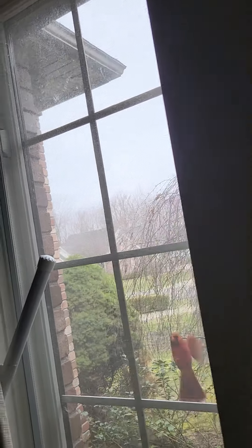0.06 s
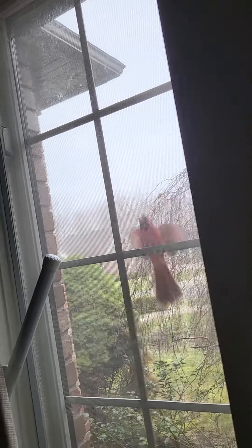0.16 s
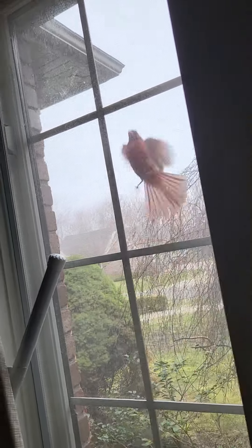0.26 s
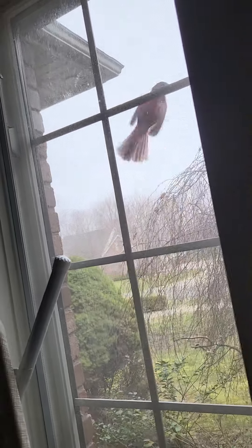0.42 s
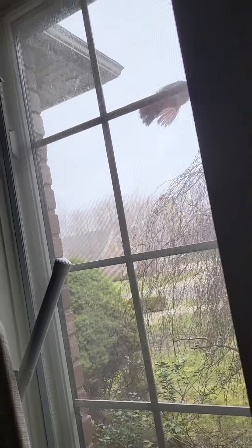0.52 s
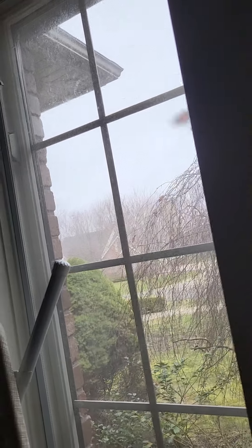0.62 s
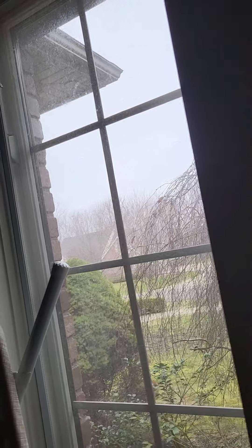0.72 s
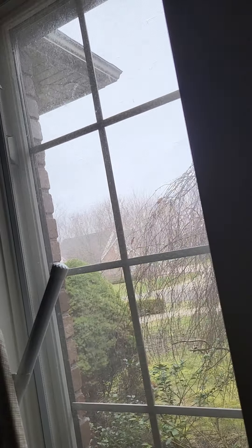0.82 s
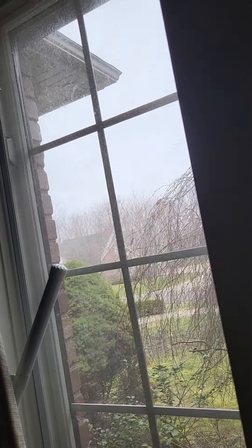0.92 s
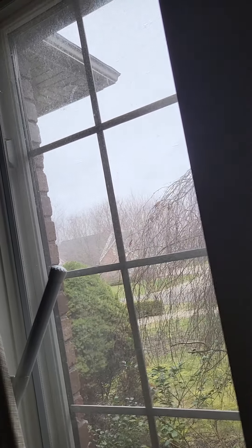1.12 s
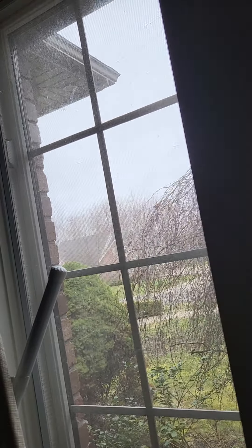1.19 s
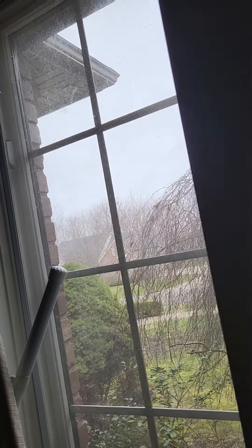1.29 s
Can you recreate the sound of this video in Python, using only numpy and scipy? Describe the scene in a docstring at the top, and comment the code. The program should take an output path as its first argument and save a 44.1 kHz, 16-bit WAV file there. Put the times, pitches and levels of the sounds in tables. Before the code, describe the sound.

One low thud of a bird hitting a window, the pane ringing briefly.

```python
"""A bird flies into a window, heard from inside a small quiet room.
A low ventilation rumble and a faint hiss run from the start.
At 0.2 s beak, head and breast land within 25 ms: the glass clacks and thuds, the sash rattles.
The pane booms on in its low modes, the sash rings thinly and the room answers.
At 1.1 s one tiny tick follows."""
import sys
import numpy as np
from scipy import signal
from scipy.fft import rfft, irfft, next_fast_len
from scipy.io import wavfile
from scipy.ndimage import map_coordinates

SR = 44100
rng = np.random.default_rng(int(sys.argv[2]) if len(sys.argv) > 2 else 0)


def master_out(mix):
    """Clip the mix to full scale and print it as 16-bit PCM to the path in sys.argv[1]."""
    frames = np.transpose(np.atleast_2d(mix))
    ceiling = np.clip(frames, -1, 1)
    pcm = np.round(ceiling * 32767).astype(np.int16)
    wavfile.write(sys.argv[1], SR, pcm)


N = 59535

# bird on glass: start_s, clack_db, rattle_db, thud_db
CONTACTS = [(.2030, -11, -9, -10), (.2046, 0, 2, -4), (.2080, 2, -1, -1), (.2140, -5, -11, -3),
            (.2225, -1, -11, -3)]
# body weight on glass: start_s, level_db
SHOVES = [(.2050, -21.5), (0.2221, -28)]
# pane resonances: pitch_hz, level_db, t60_s
PANE_MODES = [(80.7, 0, .85), (127.8, -4, .62), (162.5, -9, .52), (197.5, -6, .44), (210.4, -6, .45),
              (252.3, -1, .54), (343, 0, .39), (406, -11, .36), (491, -5, .34), (599, -6, .33),
              (711, -10, .36), (816, -9, .24), (1012, -9, .22), (1235, -4, .25), (1785, -6, .2),
              (1837, -4, .22)]
# noise colours: freq_hz, relative_density_db
CLACK_SPECTRUM = [(150, -25.5), (450, -2.5), (800, -3), (1250, 0), (1550, -4), (1850, -1), (2100, 0.5),
                  (2500, -11.5), (3300, -16.5), (6000, -58), (16000, -73.5)]
RATTLE_SPECTRUM = [(1500, -33), (3300, -13), (4400, -9.5), (5250, 0.5), (6200, -11), (7700, -13),
                   (9300, -28), (11000, -38), (16000, -39)]
THUD_SPECTRUM = [(30, -22.5), (65, -25), (100, -19), (150, -7.5), (220, -3.5), (310, 1.5), (430, -13),
                 (700, -7.5), (1500, -49.5), (4000, -86.5)]
TICK_SPECTRUM = [(3000, -40), (5500, -18), (7000, -14), (8000, -1), (8700, 0), (9500, -9), (11000, -28),
                 (16000, -45)]
RUMBLE_SPECTRUM = [(20, -31), (38, -7), (48, -7.5), (60, -5.5), (75, -3.5), (98, -24), (135, -23.5),
                   (180, -31.5), (400, -65)]
HISS_SPECTRUM = [(100, -17), (250, -4.5), (360, -3), (405, 3.5), (460, -9.5), (1000, -11), (1500, -11),
                 (3000, -14), (5000, -21.5), (8000, -22), (10000, -39), (12000, -25.5), (16000, -37)]
# room decay: freq_hz, t60_s
ROOM_DECAY = [(80, .5), (250, 0.46), (600, 0.39), (1000, 0.35), (1450, 0.42), (2200, 0.27), (5300, .32),
              (8000, .27), (14000, .16)]
# left-right likeness: freq_hz, correlation
HIT_COHERENCE = [(60, 1), (150, .92), (280, 0.94), (550, 0.6), (2000, 0.056), (4500, -0.013), (12000, 0.26)]
BACKGROUND_COHERENCE = [(60, 0.98), (240, 0.73), (950, 0.09), (3770, 0.051), (15000, 0.14)]

RING_START_S, ATTACK_S = .204, .0005
THUD_PAN_DB = 2.5


def bird_contacts():
    """Each contact clacks on the glass, rattles the sash and lands with a soft thud."""
    hits = np.zeros((2, N))
    for start_s, clack_db, rattle_db, thud_db in CONTACTS:
        clack = burst(start_s, CLACK_SPECTRUM, t60_s=.025, wet_db=-.5, chatter_db=1.5)
        rattle = burst(start_s, RATTLE_SPECTRUM, t60_s=.022, wet_db=0, chatter_db=2.5)
        thud = burst(start_s, THUD_SPECTRUM, t60_s=.05, wet_db=-2)
        hits += amp(clack_db - 27.5) * clack
        hits += amp(rattle_db - 30.5) * pan(-1) * rattle
        hits += amp(thud_db - 30) * pan(THUD_PAN_DB) * thud
    return hits


def body_shoves(pitch_hz=280.5):
    """The soft body bends the glass: round knocks of a few cycles, damped by the bird itself."""
    knocks = np.zeros(N)
    for start_s, level_db in SHOVES:
        t = since(start_s)
        knocks += amp(level_db) * np.sin(2 * np.pi * pitch_hz * t) * envelope(t, t60_s=.045, rise_s=.0037)
    return pan(THUD_PAN_DB) * knocks


def pane_boom(spread_hz_per_rad=700, wander_rad=.15):
    """The glass rings on, longest in its lowest mode; higher modes reach the ears out of step."""
    t = since(RING_START_S)
    ring = np.zeros((2, N))
    for pitch_hz, level_db, t60_s in PANE_MODES:
        ear_offset_rad = pitch_hz / spread_hz_per_rad * rng.choice([-1, 1]) * np.array([[.5], [-.5]])
        phase = 2 * np.pi * pitch_hz * t + ear_offset_rad + wander_rad * wobble(25)
        ring += amp(level_db) * np.sin(phase) * envelope(t, t60_s, rise_s=.006)
    return amp(-32) * ring


def sash_ring(pitch_hz=5380):
    """The shaken sash rings thinly, drifting in phase at each ear."""
    t = since(RING_START_S)
    phase = 2 * np.pi * pitch_hz * t + np.array([wobble(40), wobble(40)])
    return amp(-48.5) * np.sin(phase) * envelope(t, t60_s=.32, rise_s=ATTACK_S)


def tick(start_s=1.1066):
    """A tiny bright tick to the left."""
    return amp(-55) * pan(8) * burst(start_s, TICK_SPECTRUM, t60_s=.006, wet_db=-14)


def ventilation(hum_hz=60.46, wander_rad=.5, swing_db=2):
    """A wavering low hum inside a rumble, with a faint hiss."""
    phase = 2 * np.pi * hum_hz * since(0) + wander_rad * wobble(8.13)
    hum = unit_rms(np.sin(phase) * amp(swing_db * wobble(36)))
    rumble = stereo_noise(RUMBLE_SPECTRUM, BACKGROUND_COHERENCE)
    hiss = stereo_noise(HISS_SPECTRUM, BACKGROUND_COHERENCE)
    return amp(-53) * hum + amp(-56.5) * rumble + amp(-79.5) * hiss


def burst(start_s, spectrum, t60_s, wet_db, chatter_db=0):
    """One contact: fast-dying noise, its strength chattering by chatter_db, plus room tail."""
    chatter = unit_rms(amp(chatter_db * wobble(rate_hz=700)))
    direct = stereo_noise(spectrum, HIT_COHERENCE) * envelope(since(start_s), t60_s, ATTACK_S)
    return chatter * direct + amp(wet_db) * room_tail(start_s, spectrum, t60_s)


def room_tail(start_s, spectrum, burst_t60_s, rise_s=.004):
    """The room answers a burst; each frequency dies at its own rate."""
    freq_hz, frame_s, bins = signal.stft(stereo_noise(spectrum, HIT_COHERENCE), SR, nperseg=512)
    room_t60_s = log_interp(ROOM_DECAY, freq_hz)[:, None]
    equal_energy_gain = np.sqrt(burst_t60_s / room_t60_s)
    decay = amp(-60 * np.maximum(frame_s - start_s, 0) / room_t60_s)
    tail = signal.istft(bins * equal_energy_gain * decay, SR, nperseg=512)[1][:, :N]
    return tail * (1 - np.exp(-since(start_s) / rise_s))


def stereo_noise(spectrum, coherence):
    """Coloured noise at rms 1; coherence sets the mid-side split."""
    def mid_side_gains(freq_hz):
        width_rad = np.arccos(np.clip(log_interp(coherence, freq_hz), -1, 1)) / 2
        return amp(log_interp(spectrum, freq_hz)) * [np.cos(width_rad), np.sin(width_rad)]
    mid, side = filtered(rng.standard_normal((2, N)), mid_side_gains)
    return unit_rms(np.array([mid + side, mid - side]))


def filtered(x, response):
    """x through a zero-phase gain, response(freq_hz)."""
    size = next_fast_len(N + SR // 2)
    gain = response(np.fft.rfftfreq(size, 1 / SR))
    return irfft(rfft(x, size) * gain, size)[..., :N]


def envelope(t, t60_s, rise_s):
    """Exponential rise and decay."""
    return (1 - np.exp(-t / rise_s)) * amp(-60 * t / t60_s)


def wobble(rate_hz):
    """Smooth random curve, rate_hz knots a second."""
    return map_coordinates(rng.standard_normal(N // 20), [np.arange(N) * rate_hz / SR], mode="mirror")


def log_interp(table, freq_hz):
    """Table value at freq_hz on a log axis."""
    knots_hz, values = np.transpose(table)
    return np.interp(np.log(freq_hz + 1), np.log(knots_hz + 1), values)


def since(start_s):
    """Seconds since start_s, zero before."""
    return np.maximum(np.arange(N) / SR - start_s, 0)


def pan(left_minus_right_db):
    """Gains of the two ears."""
    return amp(left_minus_right_db * np.array([[.5], [-.5]]))


def amp(db):
    """Decibels to gain."""
    return 10 ** (np.asarray(db) / 20)


def unit_rms(x):
    """x at rms 1."""
    return x / np.sqrt(np.mean(x ** 2) + 1e-20)


def scene():
    """Window strike and tick over the ventilation."""
    return bird_contacts() + body_shoves() + pane_boom() + sash_ring() + tick() + ventilation()


def record(dry):
    """Brick-wall low-pass."""
    return filtered(dry, lambda freq_hz: freq_hz < 15800)


dry = scene()
out = record(dry)
master_out(out)
```